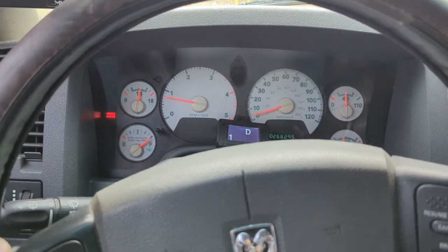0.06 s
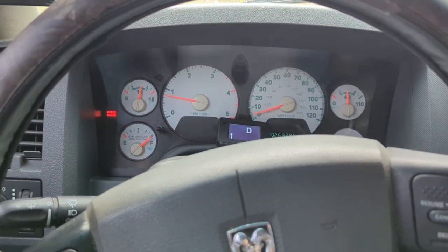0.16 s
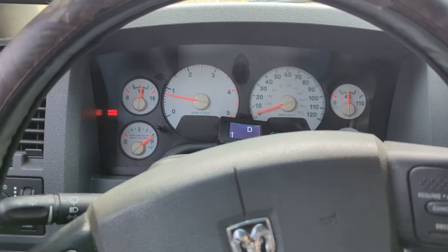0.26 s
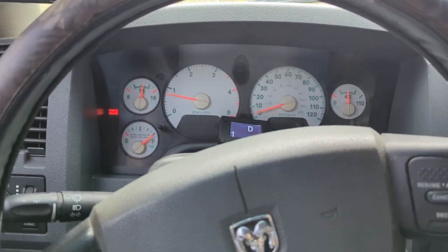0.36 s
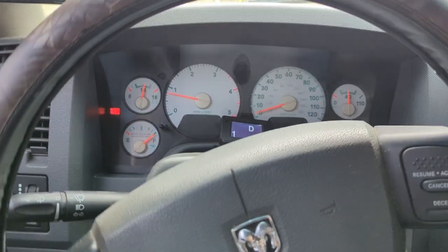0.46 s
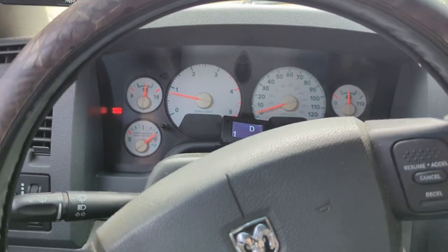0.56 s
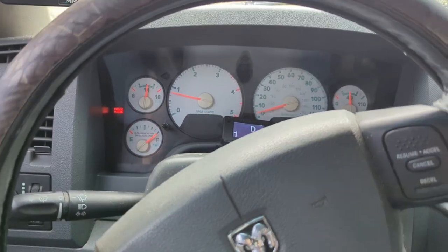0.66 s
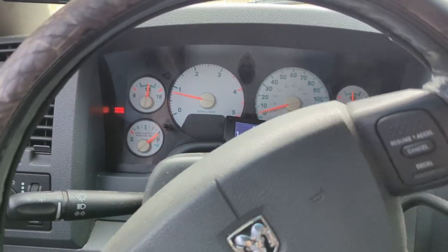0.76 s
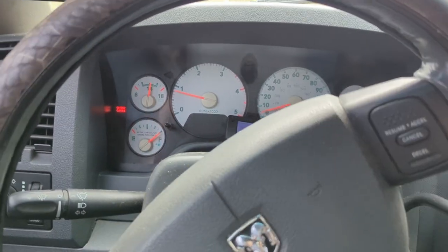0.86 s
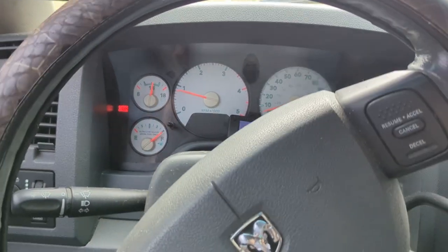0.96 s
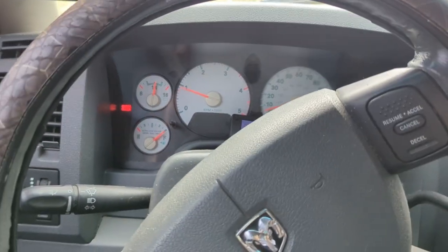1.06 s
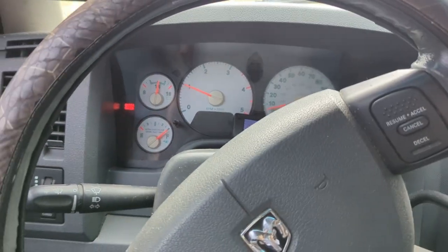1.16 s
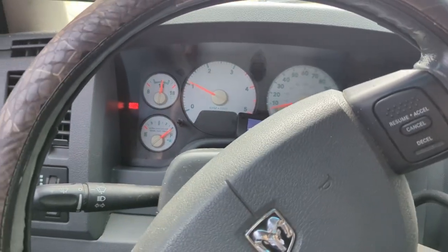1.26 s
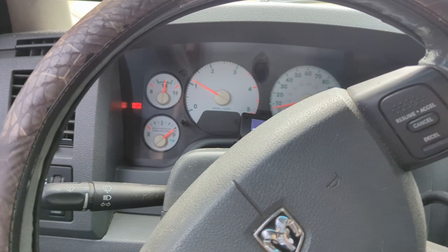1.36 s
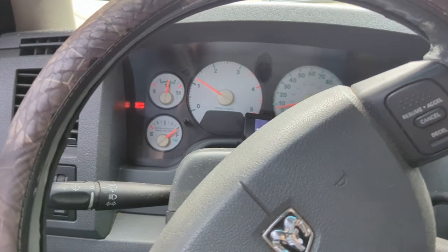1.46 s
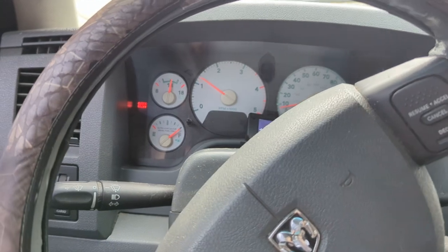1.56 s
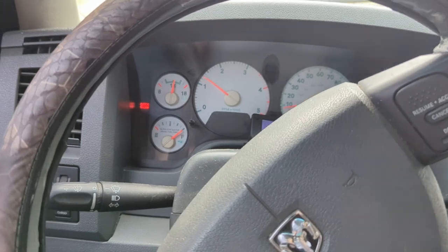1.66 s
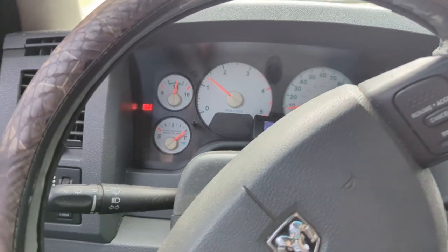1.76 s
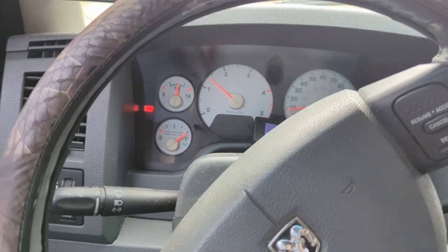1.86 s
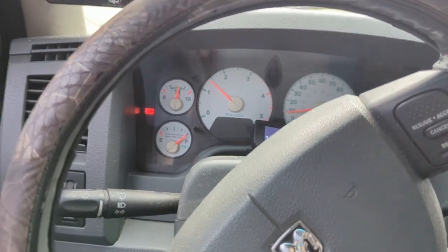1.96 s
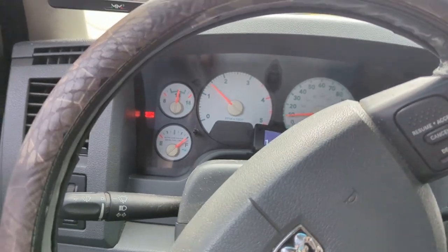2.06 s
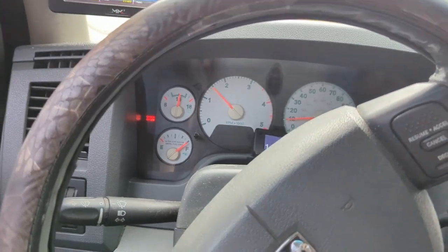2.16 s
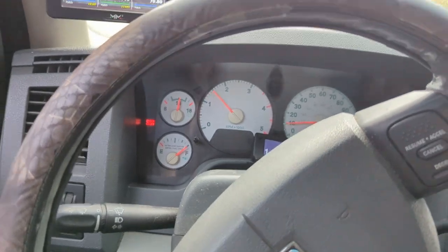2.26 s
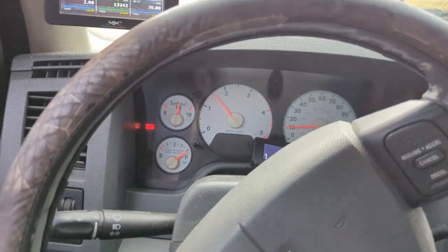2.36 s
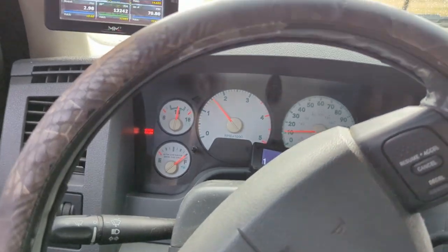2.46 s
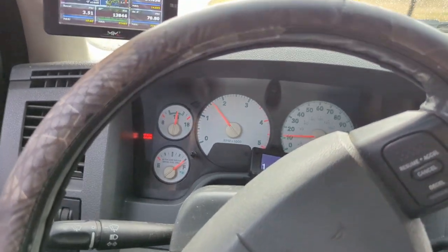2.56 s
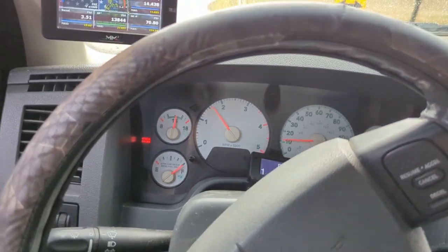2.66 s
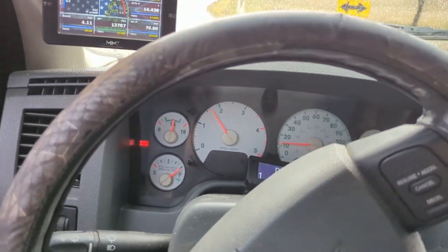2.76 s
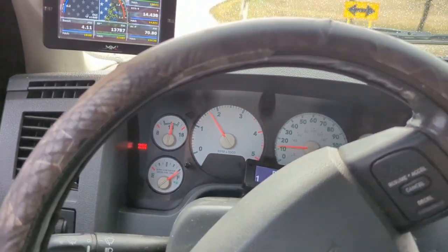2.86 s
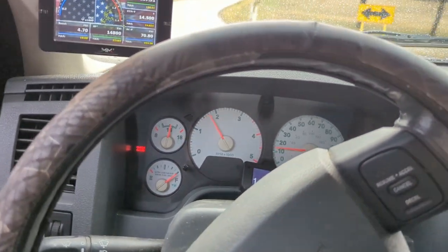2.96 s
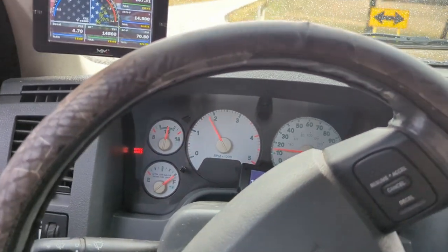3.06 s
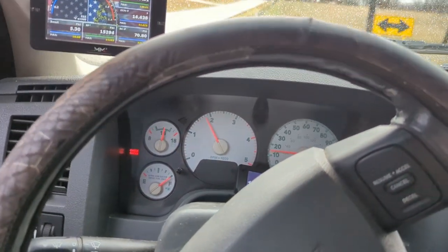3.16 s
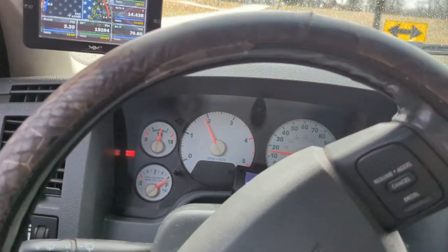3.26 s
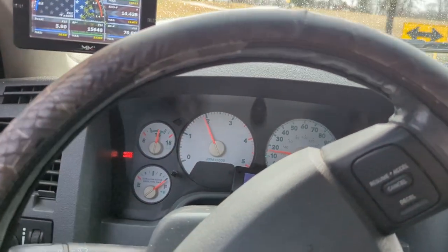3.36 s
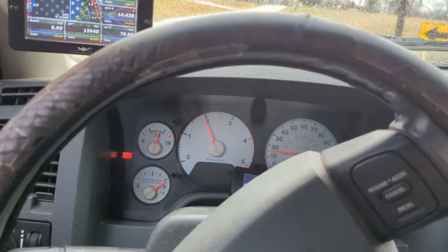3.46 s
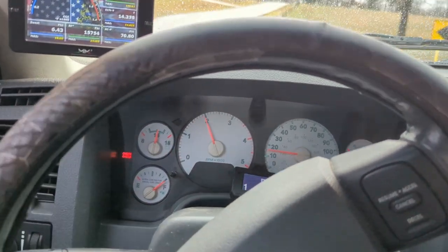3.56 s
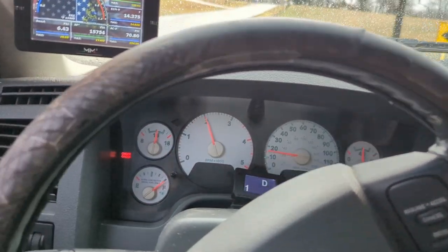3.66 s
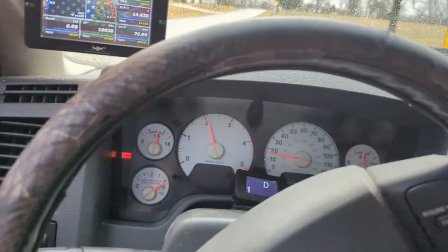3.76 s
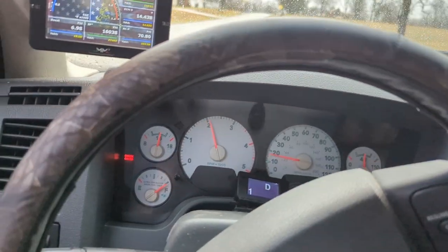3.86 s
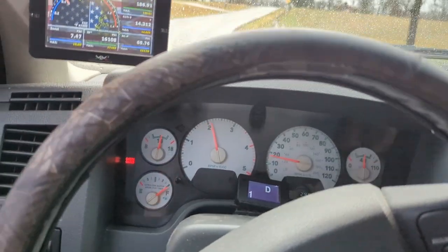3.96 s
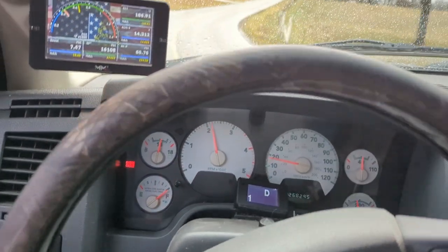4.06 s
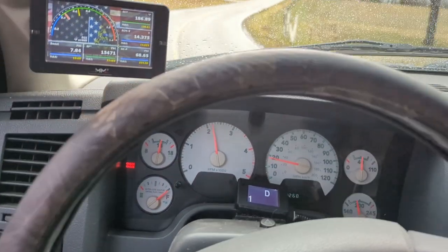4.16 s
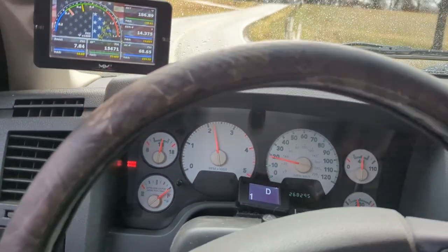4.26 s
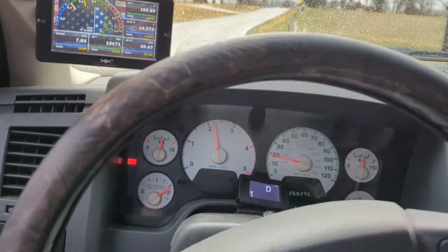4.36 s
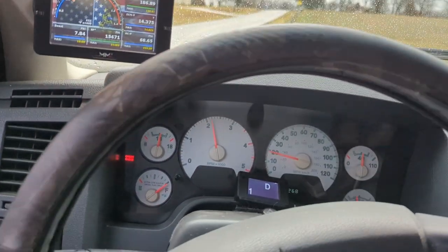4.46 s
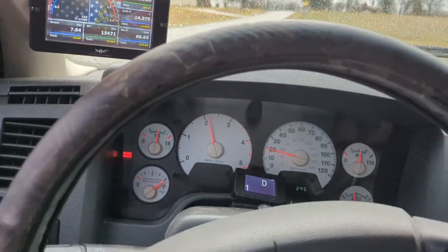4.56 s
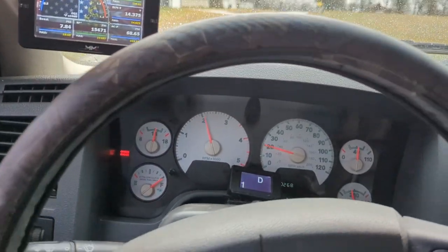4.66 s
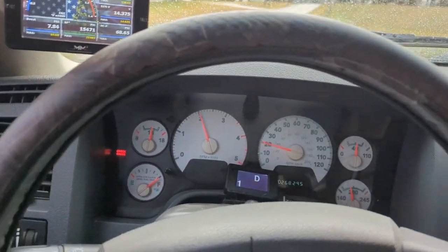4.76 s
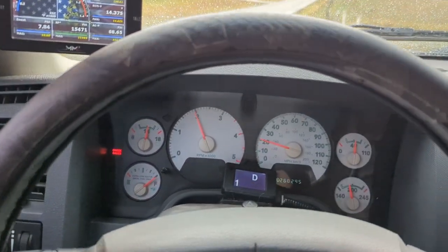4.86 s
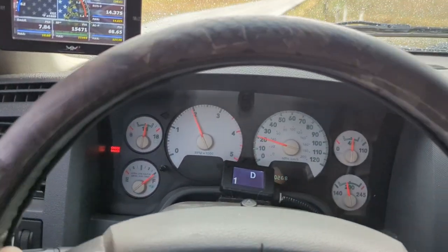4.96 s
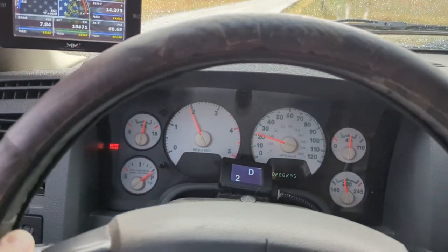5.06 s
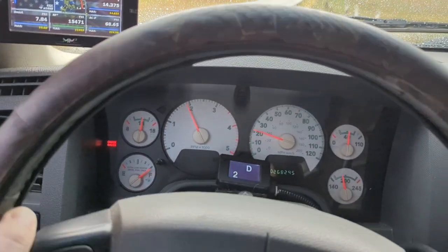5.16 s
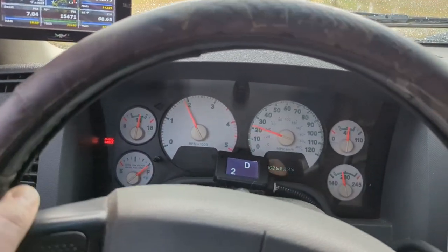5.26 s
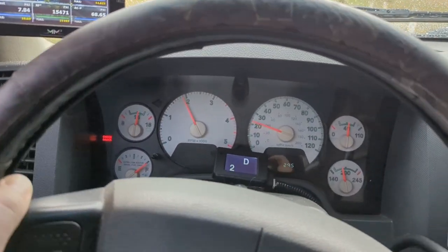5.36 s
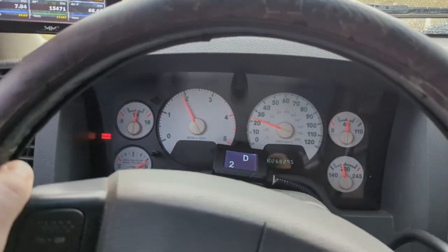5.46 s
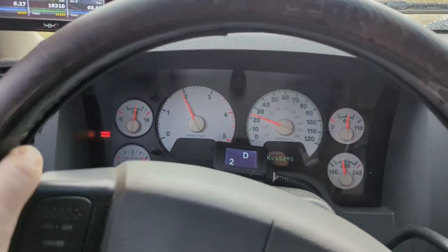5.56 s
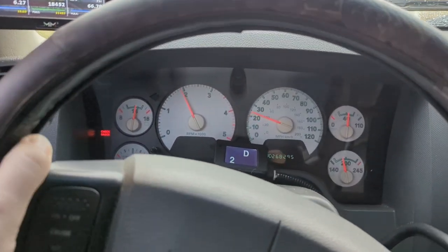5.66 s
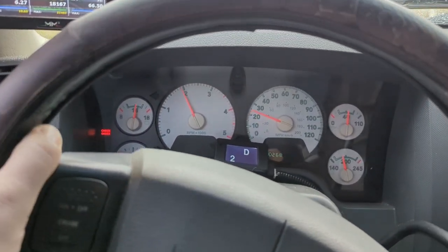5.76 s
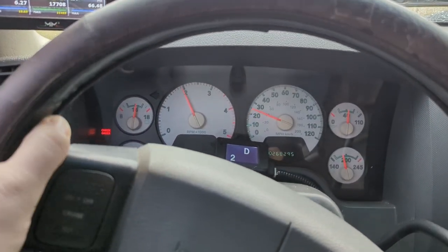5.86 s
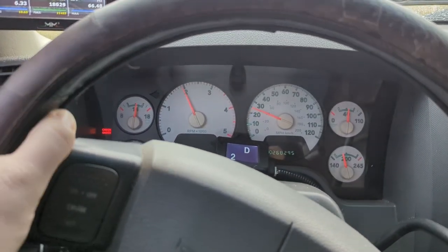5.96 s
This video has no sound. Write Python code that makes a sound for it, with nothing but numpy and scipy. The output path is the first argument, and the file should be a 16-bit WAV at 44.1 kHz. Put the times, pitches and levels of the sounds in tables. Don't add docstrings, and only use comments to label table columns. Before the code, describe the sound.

Inside a truck cab, a diesel idles low, then pulls away in a climbing boomy drone, sags at a gear change and climbs again.

```python
import sys
import numpy as np
from scipy import signal
from scipy.fft import rfft, irfft, next_fast_len
from scipy.io import wavfile
from scipy.ndimage import uniform_filter1d

SR = 44100
rng = np.random.default_rng(int(sys.argv[2]) if len(sys.argv) > 2 else 0)


def invert_db(x):
    u = np.asarray(x, float) / 20
    return 10 ** u


def wrap_up_sound(samples):
    columns = np.atleast_2d(samples).T
    tamed = np.clip(columns, -1, 1)
    steps = np.round(tamed * 32767).astype(np.int16)
    wavfile.write(sys.argv[1], SR, steps)


N = 265041

# (frequency [Hz], level [dB per Hz])
LEFT = [(450, -76), (800, -78.5), (1100, -84), (1750, -90), (2100, -92), (3100, -95.5), (4100, -100),
        (5800, -100), (7300, -99), (8800, -101), (9900, -104), (10800, -93.5), (13800, -95), (14800, -99),
        (15800, -106)]
# (frequency [Hz], level [dB per Hz])
RIGHT = [(450, -73.5), (700, -74), (1100, -80.5), (1450, -81), (2400, -82), (3100, -88.5), (3800, -96),
         (4500, -92.5), (5300, -93), (5900, -102), (7400, -100), (9000, -103), (9900, -108), (12000, -113),
         (13300, -116), (15800, -120)]
# (frequency [Hz], width [Hz], level [dB])
RINGS = [
    [(830, 66, -3), (1700, 110, 5), (1850, 60, 1), (2650, 2500, 4.5), (4100, 98, -7), (4350, 300, 4.5),
     (5160, 250, 4), (6350, 260, 6.5), (8130, 460, 4.5), (10000, 900, -2), (11800, 300, 1.5),
     (13200, 250, 3.5)],
    [(1090, 220, 2.5), (1370, 79, 2), (1580, 30, 3), (1540, 40, -2.5), (1870, 60, 4.5), (1970, 63, -4),
     (2316, 42, 3), (2280, 420, -0.5), (2880, 55, 3), (2660, 41, 3), (4030, 110, 2.5), (4100, 120, -6.5),
     (4900, 200, 4), (6500, 200, 5.5), (8150, 580, 5)],
]


def table(rows):
    s, *columns = np.transpose(rows)
    return [np.interp(np.arange(N) / SR, s, c) for c in columns]


def on_log(points, hz):
    f, db = np.transpose(points)
    return np.interp(np.log(np.maximum(hz, 1)), np.log(f), db)


def unit(x):
    return x / np.sqrt(np.mean(x ** 2))


def shape(x, gain):
    padded = next_fast_len(N + SR // 2, real=True)
    hz = np.arange(padded // 2 + 1) * SR / padded + 1
    return irfft(rfft(x, padded) * gain(hz), padded)[..., :N]


def lift(modes):
    return lambda hz: invert_db(sum(db / (1 + ((hz - f) / (width / 2)) ** 2) for f, width, db in modes))


def colour(x, points, lo_hz, hi_hz):
    def gain(hz):
        return invert_db(on_log(points, hz)) / np.sqrt((1 + (lo_hz / hz) ** 8) * (1 + (hz / hi_hz) ** 8))
    return shape(x, gain)


def walk(rate):
    k = int(SR / rate)
    steps = np.repeat(rng.standard_normal(N // k + 1), k)
    return 1.3 * uniform_filter1d(uniform_filter1d(steps, k), k)[:N]


def sine(hz, db):
    return np.sqrt(2) * invert_db(db) * np.sin(2 * np.pi * np.cumsum(hz) / SR)


def held(start, end, db, fade_db_s):
    t = np.arange(0, N, 32) / SR
    outside = np.maximum(np.maximum(start[:, None] - t, t - end[:, None]), 0)
    return np.repeat(db[:, None] - fade_db_s * outside, 32, axis=1)[:, :N]


def bump(s, length):
    return np.exp(-((np.arange(N) / SR - s) / length) ** 2)


def swells(rows):
    return sum(db * bump(s, length) for s, length, db in rows)


def idling(hz):
    return np.clip((48 - hz) / (48 - 42), 0, 1)


def cab(x, c):
    t60_s, wet_db = .08, -15
    age = np.arange(4096) / SR
    echo = rng.standard_normal(len(age)) * np.exp(-np.log(1000) * age / t60_s)
    echo = unit(echo) / np.sqrt(len(age))
    echo[0] = invert_db(-wet_db)
    x = signal.fftconvolve(x, echo / np.sqrt(np.sum(echo ** 2)))[:N]
    return shape(x, lift(RINGS[c]))


def drumming(load_db):
    # (from [s], to [s], level [dB])
    road_bumps = [(0, 0.195, -29), (0.947, 1.199, -30.5), (1.496, 1.627, -32.5), (1.893, 2.201, -25),
                  (2.395, 2.439, -19.5), (2.642, 2.676, -18.5), (2.812, 2.866, -18.5), (3.148, 3.182, -30),
                  (3.252, 3.301, -20), (3.447, 3.481, -17.5), (3.545, 3.601, -20.5), (3.676, 3.72, -25),
                  (3.854, 3.925, -22.5), (4.073, 4.235, -17.5), (4.758, 4.811, -16), (4.883, 4.898, -25.5),
                  (5.091, 5.132, -23), (5.191, 5.226, -20.5), (5.274, 5.296, -20), (5.365, 5.438, -23.5),
                  (5.618, 5.665, -29), (5.82, 5.87, -19), (5.907, 5.977, -17.5)]
    # (frequency [Hz], level [dB per Hz])
    drum = [(20, -43), (35, -19.5), (50, 8), (70, -3), (100, -8), (150, -8), (200, -17.5), (260, -19),
            (330, -21.5), (440, -19), (500, -27), (550, -29), (700, -35), (900, -46.5)]
    # (frequency [Hz], width [Hz], level [dB])
    cab_modes = [(484, 24, 7), (826, 45, 12.5), (252, 12, -1)]
    smooth_road_db = -29
    road_db = np.maximum(held(*np.transpose(road_bumps), 149).max(axis=0), smooth_road_db)
    rumble = colour(rng.standard_normal(N), drum, 15, 200)
    swing = uniform_filter1d(uniform_filter1d(rumble ** 2, size=1800), size=1800)
    rumble = rumble / np.sqrt(swing + 0.19 * np.mean(rumble ** 2))
    bounce = sine(57.1 + 6.966 * walk(12), -5 + 1.8 * walk(19))
    rumble = .6 * rumble + bounce
    mid, side = (colour(rng.standard_normal(N), drum, 75, 1100) for _ in range(2))
    side_colour = [(180, -8.5), (320, 0.0), (420, -9.0), (560, -10.0), (900, -11.5)]
    side = colour(side, side_colour, 0.92, 2000)
    panels = unit(shape(mid, lift(cab_modes)) + side * np.array([[.8], [-.8]]))
    return rumble * invert_db(road_db + 2.0) + panels * invert_db(load_db + 10.0 + 0.5 * walk(9.4))


def hum(hz, rows):
    level_db = held(*np.transpose(rows), 110).max(axis=0)
    return sine(hz + 2.9 * walk(500), level_db + 2.2 * walk(25))


def floor_hums():
    # (from [s], to [s], level [dB])
    idle_hum = [
        (0.04, .76, -44.5),
    ]
    # (from [s], to [s], level [dB])
    pan_low = [
        (0.055, .7, -41.5),
        (0.952, 1.251, -31.5),
        (4.004, 4.251, -23.5),
    ]
    # (from [s], to [s], level [dB])
    pan_high = [
        (1.393, 1.497, -36),
        (1.551, 1.697, -29),
        (1.741, 1.923, -35.5),
        (2.078, 2.302, -32),
        (2.399, 2.648, -31),
        (4.021, 4.26, -26),
    ]
    return hum(170, idle_hum) + hum(149, pan_low) + hum(191.4, pan_high)


def panel_hums():
    # (from [s], to [s], level [dB])
    dash = [
        (.4, 1.2, -66),
        (1.7, 2.25, -62),
    ]
    # (from [s], to [s], level [dB])
    door = [
        (1.72, 2.114, -37.5),
        (2.4, 2.651, -39.5),
    ]
    # (from [s], to [s], level [dB])
    roof = [
        (3.592, 3.75, -37),
        (4.274, 4.374, -32),
    ]
    # (from [s], to [s], level [dB])
    seat = [
        (4.09, 4.15, -24.5),
        (4.283, 4.331, -26),
    ]
    return hum(842, dash) + hum(225.6, door) + hum(255.6, roof) + hum(78, seat)


def buzz(hz, width, rows):
    noise = rng.standard_normal((2, N))
    noise = unit(shape(noise, lambda f: 1 / (1 + ((f - hz) / (width / 2)) ** 2)))
    level_db = held(*np.transpose(rows), 119.5).max(axis=0) + 3.6 * walk(30)
    return noise * invert_db(level_db + np.array([[-1], [3]]))


def dash_buzzes():
    # (from [s], to [s], level [dB])
    vent = [(.08, .11, -69), (.25, .31, -68), (.55, .6, -68), (.75, .91, -66.5), (1.02, 1.1, -69),
            (1.15, 1.2, -68), (3.2, 3.5, -63)]
    # (from [s], to [s], level [dB])
    bracket = [(.7, .9, -65.5), (1, 1.5, -67), (1.6, 2, -63.5), (2.55, 2.9, -63), (3.2, 3.699, -60),
               (5.3, 5.6, -56.5), (5.85, 6, -59)]
    return buzz(2200, 300, vent) + buzz(1700, 50, bracket)


def slide():
    # (from [s], to [s], left level [dB], right level [dB], pitch [Hz])
    grips = [
        (0.098, 0.235, -64, -61.5, 9900),
        (.3, .37, -71, -65, 7500),
        (0.672, 0.684, -69.5, -67.5, 7030),
        (4.081, 4.12, -71, -68, 2530),
        (4.174, 4.241, -66.5, -55.5, 2200),
        (4.3, 4.327, -68.5, -63.5, 2500),
        (4.693, 4.816, -63, -54.5, 1745),
        (5.258, 5.752, -92, -60.5, 7060),
    ]
    start, end, left, right, pitch = np.transpose(grips)
    left_db, right_db = (held(start, end, db, 231.5) for db in (left, right))
    hz = pitch[right_db.argmax(axis=0)]
    left_db, right_db = left_db.max(axis=0), right_db.max(axis=0)
    grains = rng.standard_normal((2, N)) * invert_db(4.9 * walk(69))
    out = 0
    for centre in 1200 * 2 ** np.arange(0, 3.6, .5):
        band = unit(colour(grains, [(1, 0), (2, 0)], centre / 1.19, centre * 1.19))
        out = out + band * np.exp(-(np.log2(hz / centre) / .7) ** 2)
    out[1] = colour(out[1], [(8000, -4.0), (10000, -11.0), (15000, -18.5)], 1, 17000)
    out[0] = shape(out[0], lift(RINGS[0]))
    return out * invert_db(np.array([left_db, right_db]))


def ticks():
    # (time [s], crack level [dB], left minus right [dB])
    trim = [(.146, -51.5, -4.5), (.223, -51.5, -6), (.303, -48.5, 3), (.344, -46.5, 10),
            (.38, -50.5, -10.5), (.463, -51.5, -5.5), (.781, -53.5, -9.5), (0.89, -50, 6.5),
            (1.09, -51.5, 1.5), (1.428, -47.5, -1), (2.063, -50, -2), (2.387, -55.5, -14.5),
            (2.707, -45.5, -6.5), (2.787, -51, -8), (4.946, -50, -3.5)]
    # (time [s], crack level [dB], left minus right [dB],
    # ring pitch [Hz], ring level [dB])
    knocks = [(.161, -47, 10.5, 11250, -44.5), (0.186, -40.5, 0.5, 2470, -44), (0.257, -38, 10, 11380, -44),
              (3.659, -34, -1, 2400, -38), (3.661, -51, -5, 1678, -31.5), (3.663, -51, 2.5, 3780, -47),
              (3.871, -54, -3.5, 4950, -49), (3.939, -42.5, 7.5, 5410, -53.5),
              (3.973, -50.5, -2.5, 4950, -42.5), (3.985, -56, 0, 5600, -50.5),
              (4.05, -55, -6.5, 5020, -44.5), (4.155, -36.5, -4.5, 4900, -42.5),
              (4.183, -49.5, -7, 2143, -31.5), (4.201, -38.5, 12, 1980, -35.5),
              (4.138, -53, -3.5, 2000, -40.5), (4.217, -47, 2.5, 8190, -52), (4.243, -47.5, 2, 5230, -52),
              (4.263, -46.5, 5.5, 4250, -43), (4.265, -49.5, 3.5, 3090, -40), (4.264, -50, 1.5, 2104, -36),
              (4.316, -48, 0.5, 6500, -47.5), (4.32, -50, -2.5, 4900, -50), (4.314, -41.5, -3, 2330, -28),
              (.18, -61.5, -0.5, 950, -43), (4.315, -55, -3.5, 1200, -32), (4.352, -60, -4, 4930, -45),
              (4.846, -56.5, -6.5, 5160, -47), (5.721, -57.5, 2, 802, -27.5)]
    # (time [s], ring level [dB], ring pitch [Hz], left
    # minus right [dB])
    taps = [(1.33, -43.5, 1063, -4), (2.5876, -39, 1050, -5.5), (2.9594, -37, 1100, -6.0),
            (3.026, -40.5, 908, -7), (4.534, -37.5, 1110, -4.5), (4.5573, -36.5, 1340, -1),
            (4.6613, -34.5, 1100, -2.5), (4.6996, -34, 1628, -5.5), (4.7663, -34.5, 1640, -7),
            (4.893, -35, 954, -5), (4.9352, -35.5, 1059, -5.5), (5.6604, -37.5, 1062, -6.5),
            (5.9031, -39.5, 916, -3), (5.9643, -35.5, 920, -5)]
    knock_s = 0.01
    rows = [(s, db, pan_db, 6540, db - 2, 0.0044) for s, db, pan_db in trim]
    rows += [(*row, knock_s) for row in knocks]
    rows += [(s, db - 26, pan_db, hz, db - 1.5, knock_s) for s, db, hz, pan_db in taps]
    cracks, rings = np.zeros((2, 2, N + 3000))
    age = np.arange(3000) / SR
    rise = 1 - np.exp(-age / .003)
    for s, db, pan_db, ring_hz, ring_db, length in rows:
        i = int(s * SR)
        place = slice(i, i + len(age))
        pan = invert_db(np.array([[pan_db], [-pan_db]]) / 2)
        chance = rng.standard_normal((4, len(age)))
        cracks[:, place] += chance[:2] * invert_db(db) * pan * rise * np.exp(-age / (.8 * length))
        periods = 7 if 4700 < ring_hz < 5800 else 2.2
        rattle = unit(uniform_filter1d(chance[2:], max(int(periods * SR / ring_hz), 1)))
        tone = np.sin(2 * np.pi * ring_hz * age)
        rings[:, place] += rattle * invert_db(ring_db) * pan * rise * np.exp(-age / length) * tone
        clip_db = ring_db - 9 - 30 * abs(np.log2(ring_hz / 5300))
        clip = unit(uniform_filter1d(chance[0], 400)) * np.sin(2 * np.pi * 5600 * age)
        clip_low = unit(uniform_filter1d(chance[1], 90)) * np.sin(2 * np.pi * 4900 * age)
        clip = clip + 1.8 * np.exp(-age / .02) * clip_low
        rings[:, place] += invert_db(clip_db) * pan * rise * np.exp(-age / .03) * clip
    out = rings[:, :N]
    for c, (points, db) in enumerate(((LEFT, 97), (RIGHT, 100))):
        high = colour(cracks[c, :N], points, 3800, 17000)
        low = colour(cracks[c, :N], points, 1200, 3500)
        out[c] += invert_db(db) * (high + 0.21 * low)
    return out


def whistle(rows, wobble_hz, flutter_db):
    hz, db = table(rows)
    t = np.arange(N) / SR
    on = uniform_filter1d(((t > rows[0][0]) & (t < rows[-1][0])) * 1., size=400)
    return on * sine(hz + wobble_hz * walk(500), db + flutter_db * walk(50))


def brake_squeak():
    # (time [s], pitch [Hz], level [dB])
    squeak = [(.072, 3380, -67), (.1, 3510, -66), (.185, 3510, -66), (.197, 3490, -73), (.212, 3460, -65),
              (.268, 3340, -66.5), (.285, 3300, -74), (.33, 3240, -67.5), (.35, 3190, -72),
              (.385, 3130, -76)]
    # (time [s], pitch [Hz], level [dB])
    squeak_again = [(1.18, 3420, -77), (1.235, 3470, -70.5), (1.26, 3420, -73), (1.31, 3350, -70.5),
                    (1.34, 3280, -78), (1.39, 3200, -73), (1.45, 3120, -80)]
    both_squeaks = whistle(squeak, 14, 2.2) + whistle(squeak_again, 10, 2.5)
    return both_squeaks * invert_db(np.array([[2.0], [1.5]]))


def turbo_whistle():
    # (time [s], pitch [Hz], level [dB])
    turbo = [(2.05, 11900, -88), (2.2, 12550, -77), (2.27, 12950, -70), (2.33, 13150, -67),
             (2.45, 13650, -67), (2.48, 13750, -74), (2.55, 14150, -69), (2.65, 14600, -72),
             (2.78, 15150, -74), (2.88, 15600, -85)]
    return whistle(turbo, 150, 2.8) * invert_db(np.array([[4.0], [-24.0]]))


def clutch_shudder():
    # (time [s], pitch [Hz], level [dB])
    shudder = [(.8, 52.23, -63), (.95, 47.5, -19), (1.15, 42, -27), (1.35, 36.8, -31.5), (1.55, 33.1, -41),
               (1.7, 33, -50.5)]
    return whistle(shudder, .5, 0.85)


def treble(turns, clatter_db, air_db):
    cycles = turns / (2 * np.pi)
    strength = invert_db(2.0 * rng.standard_normal(int(turns[-1] / 6) + 2))[cycles.astype(int)]
    knock = 1 + .1 * strength * np.exp(-(cycles % 1) / .42) + .3 * invert_db(4 * walk(90))
    shared, out = rng.standard_normal(N), []
    for c, points in enumerate((LEFT, RIGHT)):
        noise = (.65 - 1.3 * c) * shared + 1.2 * rng.standard_normal(N)
        clatter = colour(noise * knock, points, 680, 4200)
        air = colour(rng.standard_normal(N), points, 4200, 17000)
        clatter = clatter * invert_db(clatter_db + 95 + 0.42 * walk(10.0))
        out.append(clatter + air * invert_db(air_db + 110 + 0.82 * walk(11)))
    return np.array(out)


def boom(hz, locked):
    # (level off resonance [dB], change at idle [dB], change in second gear [dB])
    strong = [
        (-28.5, -20.5, 5.5),
        (-20.5, -10, -1.5),
        (-23, -7, -1),
        (-43.5, 9.5, 13.5),
    ]
    # (frequency [Hz], width [Hz], level [dB])
    paths = [
        [(50.7, 3.8, 2.5), (61.2, 21, 18.5), (76, 5.1, -19.5), (107.25, 11.27, 22)],
        [(58.5, 10, 11.5), (71, 23, -19), (93.2, 28.8, -24.5), (106.3, 8.7, 13.5), (137, 69, 3.5),
         (147, 6, 1.5), (166, 5.6, -9.5)],
        [(123, 8.7, 2), (152.35, 4.8, 11), (207.1, 26, -5.5), (219, 24, -7.5)],
        [(138, 55, 14.5), (195.6, 8.5, 12.5), (230, 9.2, -10), (259, 22, 8.5), (257.4, 12, -13.5)],
    ]
    # (time [s], length [s], level [dB])
    dips_and_surges = [
        (1.558, 0.038, -15.5),
        (3.977, 0.024, -6.5),
        (4.114, 0.086, 6),
        (4.471, 0.093, 10.5),
        (4.566, 0.02, -11.5),
        (4.618, 0.026, 8.5),
        (5.266, 0.15, 3),
        (5.78, 0.078, -4),
    ]
    # (time [s], length [s], level [dB])
    half_order = [
        (1.874, 0.089, 5.5),
        (2.45, 0.21, 1),
        (3.6, 0.072, -1.5),
        (4.096, 0.25, -3.5),
        (4.441, 0.062, -22),
        (4.596, 0.028, 5),
        (5.907, 0.13, -16.5),
    ]
    # (time [s], length [s], level [dB])
    second = [
        (2.352, 0.1, 2.5),
        (3.404, 0.12, -1),
        (4.46, 0.053, 5),
        (4.622, 0.085, -15.5),
        (5.847, 0.28, 1.5),
    ]
    changes = [swells(dips_and_surges), swells(half_order), swells(second), 0]
    out = []
    for k, ((db, idle_db, gear_db), path) in enumerate(zip(strong, paths)):
        path_db = 20 * np.log10(lift(path)((1 + k / 2) * hz))
        out.append(db + idle_db * idling(hz) + gear_db * locked + path_db + changes[k])
    return out


def orders(turns, hz, load_db, locked):
    # (sixths of the firing rate, level [dB])
    uneven = [(3, -2.5), (4, -7.5), (5, -0.5), (7, -18), (8, -22), (10, -5.5), (11, -2.5), (13, -8),
              (14, -19), (16, -4.5), (17, -8), (18, -1), (19, -28), (20, -17), (21, -2.5), (22, -16.5),
              (23, -4), (24, -1.5), (25, -18.5), (26, -7.5), (27, -4), (29, -10), (30, -3.5), (32, -10.5),
              (33, -3.5), (34, -4.5), (36, -2), (39, -6.5), (40, -3.5), (42, -0.5), (45, -4)]
    # (frequency [Hz], level [dB])
    cab_pass = [(25, -65), (45, -22), (65, -23.5), (110, -25.5), (150, -23.5), (190, -25.5), (230, -36),
                (290, -36), (330, -40), (440, -43.5), (485, -36.5), (540, -50.5), (700, -54)]
    # (sixths, at idle [dB], in second gear [dB])
    state = [(10, 1, 0), (16, -0.5, 1.5), (17, 0, 0.5), (18, -1, 3.5), (21, 4.5, 0), (23, 0.5, 3),
             (24, 2, -1), (26, 0.5, -3), (27, -5.5, -2.5), (30, -0.5, 0), (33, 0, -2.5), (34, 3, -5)]
    # (sixths, time [s], length [s], level [dB])
    weak_swells = [(10, 4.12, .15, 4), (18, 2, .2, 2.5), (18, 3.2, 0.4, 3), (24, 2.7, .2, 3.5),
                   (27, 2.15, .2, -1.5), (30, 3.22, .14, 5), (34, 2.68, .13, 4.5), (36, 2.4, .1, 2),
                   (30, 2.3, .15, -1.5), (27, 5.5, .15, -4.5), (24, 4.9, .15, -4)]
    # (frequency [Hz], width [Hz], level [dB])
    air_mode = [(484, 11, 6.5), (360, 22, 3.5), (284, 6.7, 2.5)]
    idle = idling(hz)
    rough = np.clip((hz - 38) / 30, .15, 1) * (1 - .85 * locked)
    bite_db = -5 * bump(4.27, 1) + 1 * locked + 2.5 * idle
    smear = 1.1 + .7 * locked + .8 * idle
    null_lead = 1.5 * bump(1.8, .22)
    lag = np.array([[1], [-1]])
    out = np.zeros((2, N))
    for k, db in enumerate(boom(hz, locked)):
        order = 1 + k / 2
        phase = order * turns + k + smear * k ** 2 / 2 + null_lead * (k == 0)
        out += np.sqrt(2) * invert_db(db) * np.sin(phase + lag * order * hz / 2300.0)
    for sixths, db in uneven:
        order = sixths / 6
        push_db = load_db * (0.72 + order / 8.8) + bite_db * (order > 2.9)
        gain = invert_db(db + on_log(cab_pass, order * hz) + push_db + 1.6 * rough * walk(4))
        change = [idle_db * idle + gear_db * locked for k, idle_db, gear_db in state if k == sixths]
        change += [swell_db * bump(s, length) for k, s, length, swell_db in weak_swells if k == sixths]
        gain = gain * invert_db(sum(change)) * lift(air_mode)(order * hz)
        drift = rng.uniform(0, 2 * np.pi) + rough * (.4 * walk(5) + .05 * order * walk(14))
        out += gain * np.sin(order * turns + drift + lag * order * hz / 990.0)
    return out


def scene():
    # (time [s], firing rate [Hz])
    firing_rate = [(0, 38.5), (.5, 39.8), (.7, 40.2), (.875, 46.4), (1, 55.4), (1.125, 60), (1.5, 67.4),
                   (2, 75), (2.625, 84.7), (3.25, 97.8), (3.625, 105.4), (3.75, 106.4), (4.06, 112.8),
                   (4.2, 111), (4.5, 100.1), (4.75, 95), (5, 92.1), (6.01, 99.5)]
    # (time [s], load [dB])
    throttle = [(0, -48), (.75, -46.5), (1.1, -40), (1.45, -40.5), (1.75, -40.5), (2.8, -38), (3.3, -35),
                (4.2, -37), (4.9, -35), (5.4, -34.5), (6.01, -35.5)]
    # (frequency [Hz], level [dB])
    tilt = np.array([(60, 1), (110, -1), (200, 5), (380, -4), (600, 2.5)])
    hz, load_db = table(firing_rate)[0], table(throttle)[0]
    turns = 2 * np.pi * np.cumsum(hz) / SR
    locked = .5 + .5 * np.tanh((np.arange(N) / SR - 4.71) / 0.022)
    jolt = bump(4.2, 0.11)
    bass = drumming(load_db - 2.5 * locked) + floor_hums() + clutch_shudder()
    bass = bass + orders(turns, hz, load_db + 34.5, locked)
    bass = bass + sine(4.5 * hz, -36 - 20 * np.clip(hz - 42, 0, 5))
    bass = np.array([colour(bass[c], tilt * [1, .5 - c], .1, SR) for c in range(2)])
    clatter_db = -60.5 + 0.1447 * (hz - 42) + 2.5 * jolt + 1.65 * locked
    air_db = -71.5 + 0.45 * (load_db - throttle[0][1]) + 5 * jolt
    far = treble(turns, clatter_db, air_db)
    far = np.array([cab(far[c], c) for c in range(2)])
    small = panel_hums() + dash_buzzes() + slide() + ticks()
    return bass + far + small + brake_squeak() + turbo_whistle()


def band_limit(x):
    return signal.sosfilt(signal.butter(12, 15700, fs=SR, output="sos"), x)


def record(dry):
    x = signal.sosfilt(signal.butter(2, 22, "high", fs=SR, output="sos"), dry)
    x = x * np.minimum(np.arange(N) / (.004 * SR) + .15, 1)
    x = x / (1 + (x / .99) ** 10) ** .1
    return band_limit(x)


dry = scene()
out = record(dry)
wrap_up_sound(out)
```